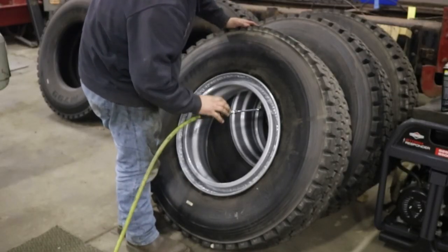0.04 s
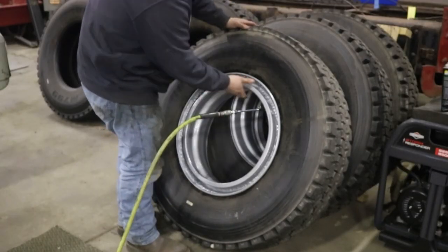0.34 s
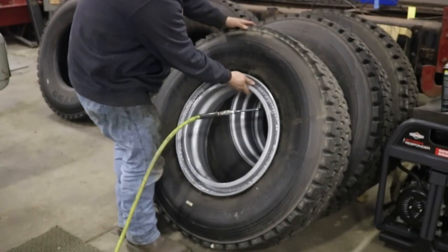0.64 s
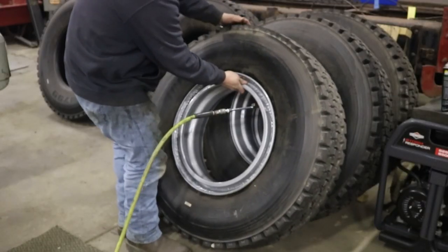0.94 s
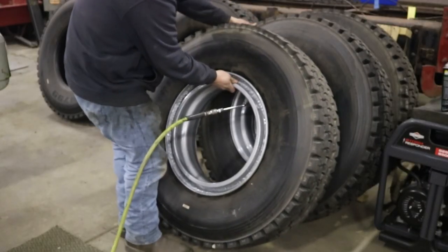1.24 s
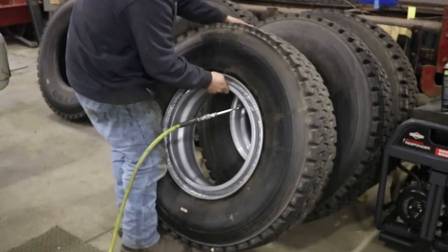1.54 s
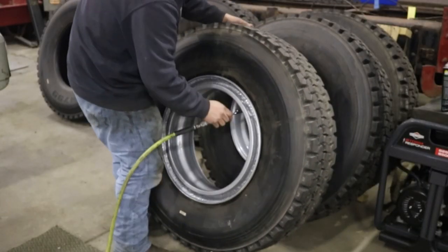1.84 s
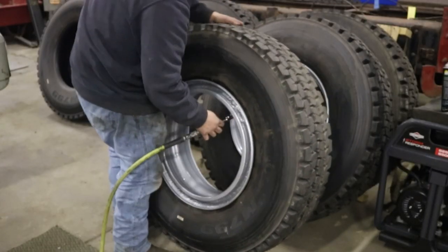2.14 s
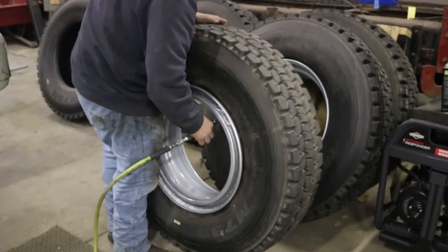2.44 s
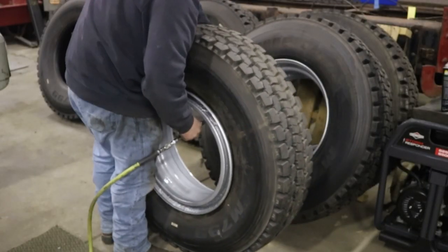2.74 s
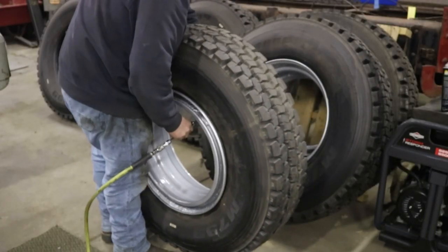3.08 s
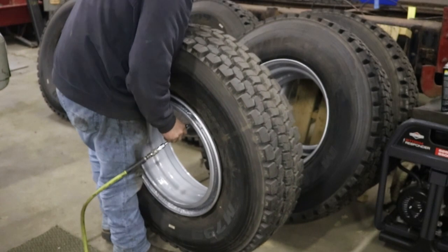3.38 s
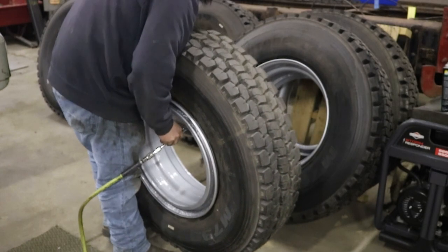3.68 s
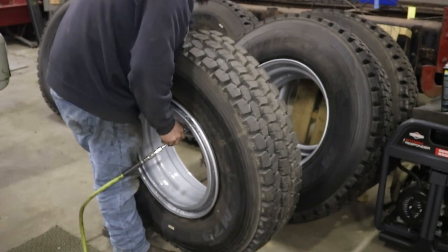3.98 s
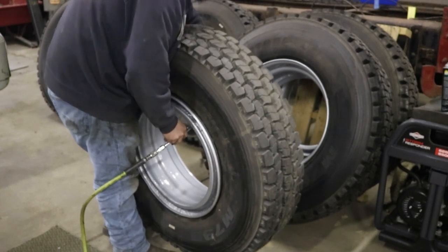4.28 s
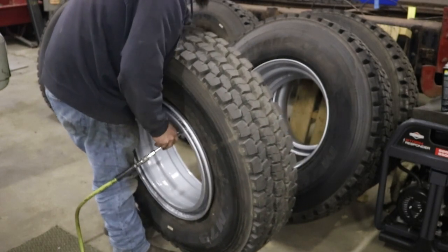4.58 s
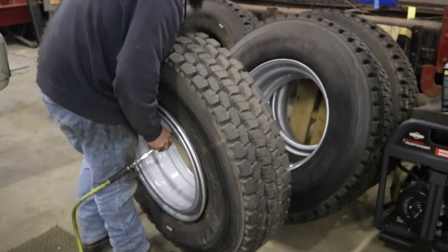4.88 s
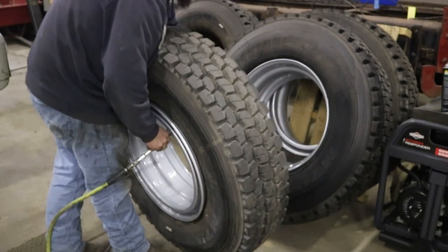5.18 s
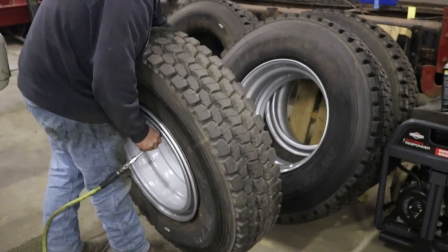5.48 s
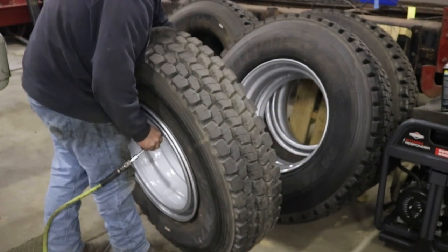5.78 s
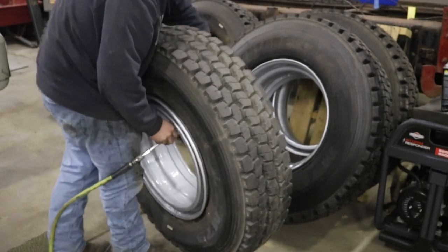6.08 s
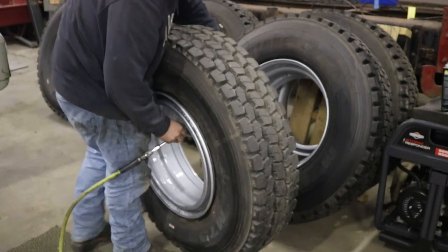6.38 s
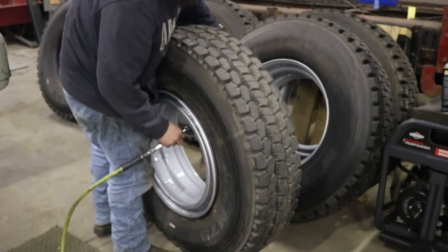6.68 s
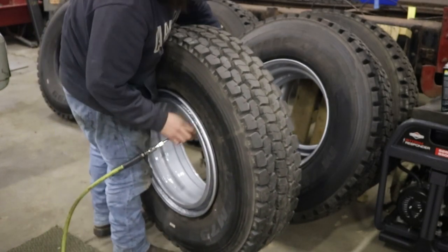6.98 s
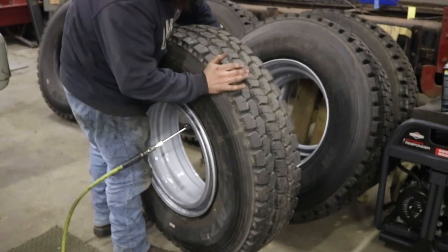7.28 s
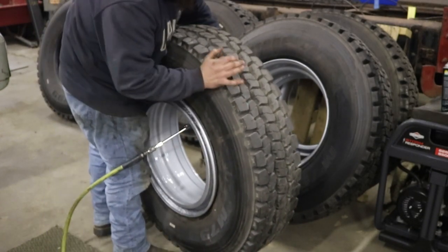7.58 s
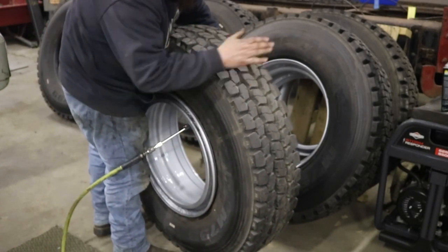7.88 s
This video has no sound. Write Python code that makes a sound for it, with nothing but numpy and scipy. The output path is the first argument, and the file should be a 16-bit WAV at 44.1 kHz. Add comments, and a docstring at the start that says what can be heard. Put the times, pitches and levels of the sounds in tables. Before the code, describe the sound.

Compressed air hisses steadily as it leaks from a truck tire, its hollow ring shifting as the tire is rolled.

```python
"""Air leaking past a truck tire's bead

A workshop, one fixed microphone near the tire. Compressed air rushes in from a hose chuck, but the bead
does not seal: the leaking jet hisses and sets the air in the tire and the steel rim ringing. As the tire
is rolled and turned off mic, the hollow part fades and the resonances change. Boots and rubber knock
softly under the hiss."""
import sys
import numpy as np
from scipy import signal
from scipy.fft import rfft, irfft, next_fast_len
from scipy.io import wavfile

SR = 44100
rng = np.random.default_rng(int(sys.argv[2]) if len(sys.argv) > 2 else 0)


def master(y):
    """Save y as 16-bit WAV."""
    cut = np.clip(np.atleast_2d(y).T, -1, 1)
    pcm = np.round(cut * 32767)  # scale
    wavfile.write(sys.argv[1], SR, pcm.astype(np.int16))


N = 354123

# air leaving the bead gap, before trim and flutter: (time [s], level [dB])
LEAK_LEVEL = [(0.0, -18.6), (0.4, -19.5), (0.5, -18.5), (1.25, -20), (1.35, -18), (1.5, -19.5), (2.15, -18),
              (2.95, -19.1), (3.3, -17.5), (3.7, -18), (3.9, -19.4), (4.65, -17), (5.05, -18.5),
              (5.15, -18), (5.7, -20), (5.95, -19), (6.6, -19), (8.03, -18)]
# pose of the tire: (time [s], turn [0 = rim on mic, 1 = turned away])
TIRE_TURN = [(0, 0.025), (2.0, 0.074), (2.6, 0.32), (3.0, 0.62), (4.0, 0.96), (8.03, 0.95)]
# broad colour of the jet: (frequency [Hz], relative level facing [dB], turned [dB])
JET_SPECTRUM = [(300, -46, -83), (710, -41.5, -46.5), (1197, -36, -52.5), (1472, -18.5, -37.5),
                (2005, -22.5, -27), (2374, -11, -15), (3350, 0, -2), (4380, -1, -4), (5300, -2.5, -2),
                (7440, -2, -4), (10140, 0, -2.1), (12200, -1.1, -0.8), (13640, -2.8, -3.5),
                (16500, -8.5, -8.5)]
# air modes inside the tire: (centre [Hz], width [Hz], lift facing [dB], lift turned [dB])
TIRE_AIR_MODES = [(790.5, 38, 28.5, 24.5), (842.4, 16, 25.5, 27), (914, 31, 16, 24), (1006, 26, 15.5, 25.5),
                  (1115, 26, 11.5, 30.5), (1230, 40, 15.5, 15), (1302, 25, 17.5, 9), (1313, 11, 10.5, 9),
                  (1367, 44, 11, 18), (1414, 22, 8, 1), (1515, 6, 17, 20), (1537.6, 24.4, 18, 11.5),
                  (1575, 20, 8.5, 13), (1630, 26, 17.5, 10), (1683, 40, 9.5, 13), (1750.2, 22, 8, 20.5),
                  (1770.6, 29.6, 17, 15), (1810.5, 31, 9.5, 17), (1833, 26, 7, 5), (1904, 48, 14.5, 13),
                  (1960, 23, 13, 15.5), (2049, 46, 23, 20), (2134, 61, 8.5, 13), (2223, 128, 11.5, 13.5),
                  (2458, 91, 9, 9), (2553, 56, 7.5, 11), (2667, 25, 10, 11), (2720, 53, 7, 9.5)]
# resonances of rim well and bead gap: (centre [Hz], width [Hz], lift facing [dB], lift turned [dB])
RIM_RESONANCES = [(2820, 15, 3, 9.5), (2963, 115, 7, 3.5), (3144, 64, 5, 4), (3214, 15, 6, 6.5),
                  (3520, 44, 7, 4), (3586, 51, 1.5, 6), (3765, 22, 4.5, 7), (3800, 14, -4, 6),
                  (4110, 65, 4.5, 2), (4170, 102, 0, 2.5), (4540, 45, 1.5, 4.5), (4620, 87, 4.5, 2.5),
                  (4870, 51, 3, 3), (5074, 290, 4, 3.5), (5315, 44, 2.5, 1), (5480, 61, 0.5, 4.5),
                  (5680, 62, 2, 4), (5700, 102, 4, -1), (6350, 38, 2, 3), (6482, 81, 2.5, 2.5),
                  (7421, 51, 2, 2), (7670, 51, -1, 3.5), (7750, 50, -1.5, 5), (8030, 49, -3, 3),
                  (8480, 75, 2.5, 3.5), (9035, 74, 0, 5.5), (11300, 91, -5, 3), (11639, 57, 6, 3.5)]
# target for the tire's low ring, below RING_TOP_HZ: (time [s], level [dB])
LOW_RING_LEVEL = [(0.0, -46.5), (1.2, -58.5), (1.8, -54), (2.05, -57), (2.95, -62.1), (3.75, -59),
                  (3.9, -64.5), (4.35, -62), (8.03, -63.5)]
# breathy edge tone and its octave: (centre [Hz], width [Hz])
EDGE_TONE_BANDS = [(6140, 210), (12265, 86)]
# flares of the edge tone: (time [s], half length [s], lift [dB])
EDGE_TONE_FLARES = [(3.12, .33, 5), (4.3, .2, 4)]
# beams of hiss crossing the microphone: (time [s], half length [s], centre [Hz], width [Hz], lift [dB])
HISS_BEAMS = [(1.75, .45, 3160, 2000, 2.3), (2.25, .4, 15000, 2600, 4.5), (2.25, 0.49, 9900, 1600, 3),
              (3.55, .25, 5400, 1100, 1.5), (5.66, 0.074, 7000, 4000, -1)]
# boots, hands and rubber: (time [s], peak [dB], centre [Hz], width [Hz], t60 of the room blur [s])
SOFT_KNOCKS = [(1.660, -50, 498, 220, 0.22), (2.125, -58, 330, 300, .45), (2.290, -47, 331, 260, .22),
               (2.760, -62, 400, 250, .2), (2.855, -64, 70, 50, .2), (5.066, -48, 210, 270, .3),
               (7.372, -56, 58, 45, .28), (7.556, -50, 63, 45, .2), (7.765, -60, 62, 50, .45)]
# low rush of air in tire and hose: (frequency [Hz], relative density [dB])
RUSH_SPECTRUM = [(15, -42), (25, -16), (45, -6), (75, -3), (108, -1.5), (151, -2), (208, -9), (246, -6.5),
                 (279, 1), (321, -8), (424, -3.5), (552, -9), (592, -9), (700, -7.5), (910, -45),
                 (1540, -120)]

FRAME, HOP = 6144, 1536   # samples
RING_TOP_HZ, RING_FULL_HZ, RING_GONE_HZ = 1200, 950, 2300
ROLL_SETTLE_S = 1.895   # time constant: the tire rolls fast at first, then slowly comes to rest


def leak(trim_db=0.36, flutter_db=0.29, flutter_rate=18):
    """Turbulent air escapes at the bead; the flow flutters and the colour follows the tire's pose."""
    hz, t, turbulence = signal.stft(rng.standard_normal(N), SR, nperseg=FRAME, noverlap=FRAME - HOP)
    bins = hz[:, None]
    turn = np.clip(in_time(TIRE_TURN, t), 0, 1)
    db = (1 - turn) * jet_colour(bins, pose=1) + turn * jet_colour(bins, pose=2)
    db = db + reflections(bins, t) + beams(bins, t) + edge_tone(bins, t, turn) + hollow(bins, t, turn)
    gain = with_low_ring(from_db(db), hz, t)
    hiss = signal.istft(turbulence * gain, SR, nperseg=FRAME, noverlap=FRAME - HOP)[1][:N]
    now = np.arange(N) / SR
    flutter = flutter_db * drift(now, flutter_rate)
    return rms_one(hiss) * from_db(in_time(LEAK_LEVEL, now) + trim_db + flutter)


def jet_colour(hz, pose):
    """The jet's spectrum, lifted at each resonance of tire and rim (dB); pose 1 is on mic, 2 is off."""
    modes = TIRE_AIR_MODES + RIM_RESONANCES
    lifts = sum(lift[pose - 1] * bell(hz, centre, width) for centre, width, *lift in modes)
    return spectrum_db(JET_SPECTRUM, hz, column=pose) + lifts


def with_low_ring(gain, hz, t, trim_db=0.1):
    """The tire's lowest air modes swell or fade toward the low ring's level; total power is 1."""
    power = gain ** 2
    share_db = 10 * np.log10(power[hz < RING_TOP_HZ].sum(axis=0) / power.sum(axis=0))
    lift_db = in_time(LOW_RING_LEVEL, t) - in_time(LEAK_LEVEL, t) - share_db + trim_db
    reach = np.interp(hz, [RING_FULL_HZ, RING_GONE_HZ], [1, 0])
    gain = gain * from_db(np.outer(reach, lift_db))
    return gain / np.sqrt(np.sum(gain ** 2, axis=0))


def hollow(hz, t, turn, sinks_at_s=5.88, sink_s=0.77, sink_db=4.5):
    """Off mic, the hollow middle swells and sags with the leak; it sinks once the tire is still (dB)."""
    leak_db = in_time(LEAK_LEVEL, t)
    swing_db = turn * (leak_db - leak_db.mean())
    sunk = np.clip((t - sinks_at_s) / sink_s, 0, 1)
    return (swing_db - sink_db * sunk) * bell(hz, centre=1900, width=810)


def edge_tone(hz, t, turn, facing_db=2, turned_db=4):
    """A breathy whistle grows out of the hiss as the tire turns, and flares twice (dB)."""
    flares_db = sum(db * hump(t, s, half) for s, half, db in EDGE_TONE_FLARES)
    lift_db = (1 - turn) * facing_db + turn * turned_db + flares_db
    return lift_db * sum(bell(hz, centre, width) for centre, width in EDGE_TONE_BANDS)


def beams(hz, t):
    """Narrow beams of hiss sweep onto the microphone, or briefly off it, as the tire rolls (dB)."""
    return sum(db * hump(t, s, half) * bell(hz, centre, width)
               for s, half, centre, width, db in HISS_BEAMS)


def reflections(hz, t, ripple_db=0.76, first_s=.0016, last_s=.05, shift_s=0.000902, scatter_hz=2200):
    """Echoes off floor, body and stacked tires comb the hiss (dB); paths shift with roll and sway."""
    roll = 1 - np.exp(-t / ROLL_SETTLE_S)
    db = 0
    for late, slide in rng.random((24, 2)):   # one draw per echo path
        sway = 0.033 * drift(t, rate=2.14)
        delay = first_s * (last_s / first_s) ** late + shift_s * ((2 * slide - 1) * roll + sway)
        db = db + ripple_db * np.cos(2 * np.pi * hz * delay)
    return db * hz ** 2 / (hz ** 2 + scatter_hz ** 2)   # long waves bend round small obstacles


def knocks(rise_s=0.01, room_gain=0.76, note_t60_ratio=0.79):
    """Each soft contact rings one damped note, blurred by the workshop into a longer, dull burst."""
    out, t = np.zeros(N + SR), np.arange(SR) / SR
    for s, db, hz, width, t60 in SOFT_KNOCKS:
        band = np.exp(-2 * ((np.fft.rfftfreq(SR, 1 / SR) - hz) / width) ** 2)
        blur = rms_one(irfft(band * rfft(rng.standard_normal(SR)), SR)) * from_db(-60 * t / t60)
        note = np.sin(2 * np.pi * hz * t) * from_db(-60 * t / (note_t60_ratio * t60))
        burst = (note + room_gain * blur) * np.minimum(t / rise_s, 1) ** 2
        start = int(s * SR)
        out[start:start + SR] += from_db(db) * burst / np.abs(burst).max()
    return out[:N]


def rush(mean_db=-72, db_per_ring_db=0.53):
    """Far under the hiss, air rushes in tire and hose, rising and falling with the low ring."""
    size = 2 * next_fast_len(N // 2 + 1)
    colour = from_db(spectrum_db(RUSH_SPECTRUM, np.fft.rfftfreq(size, 1 / SR)))
    noise = irfft(colour * rfft(rng.standard_normal(size)))[:N]
    ring_db = in_time(LOW_RING_LEVEL, np.arange(N) / SR)
    return from_db(mean_db + db_per_ring_db * (ring_db - ring_db.mean())) * rms_one(noise)


def from_db(db):
    """Decibels to gain."""
    return 10 ** (np.asarray(db) / 20)


def rms_one(x):
    """Scale to rms 1."""
    return x / np.sqrt(np.mean(x ** 2) + 1e-20)


def in_time(curve, t):
    """A (time, value) curve at the times t."""
    return np.interp(t, *np.transpose(curve))


def spectrum_db(points, hz, column=1):
    """One column of a spectrum, joined by lines over log frequency."""
    points = np.array(points)
    return np.interp(np.log(hz + 1), np.log(points[:, 0]), points[:, column])


def bell(hz, centre, width):
    """The shape of a resonance, 1 at its top."""
    return 1 / (1 + (2 * (hz - centre) / width) ** 2)


def hump(t, centre, half):
    """A smooth rise and fall, 1 at its top."""
    return np.exp(-((t - centre) / half) ** 2)


def drift(t, rate):
    """A random wander with `rate` changes a second."""
    return np.interp(t * rate, np.arange(200), rng.standard_normal(200))


def scene():
    """Hiss in front, knocks and rush beneath; one microphone feeds both channels."""
    return np.tile(leak() + knocks() + rush(), (2, 1))


def record(dry, cutoff_hz=15750):
    """A steep low-pass cuts the top of the microphone's signal."""
    return signal.sosfilt(signal.ellip(14, .1, 90, cutoff_hz, fs=SR, output="sos"), dry)


dry = scene()
out = record(dry)
master(out)
```